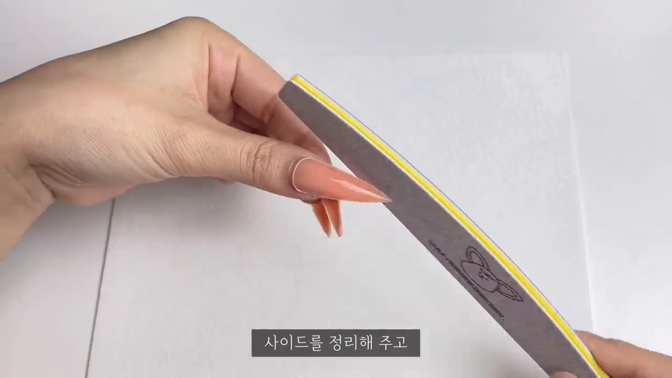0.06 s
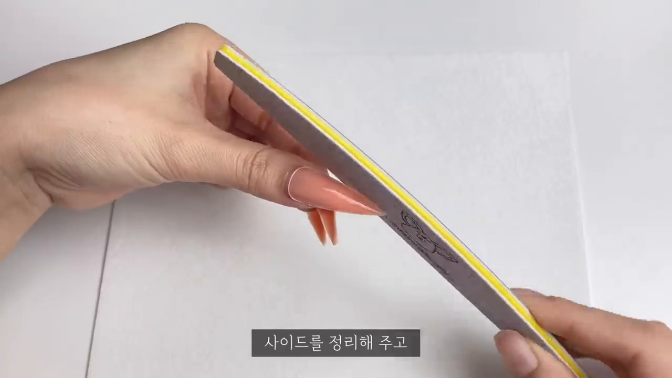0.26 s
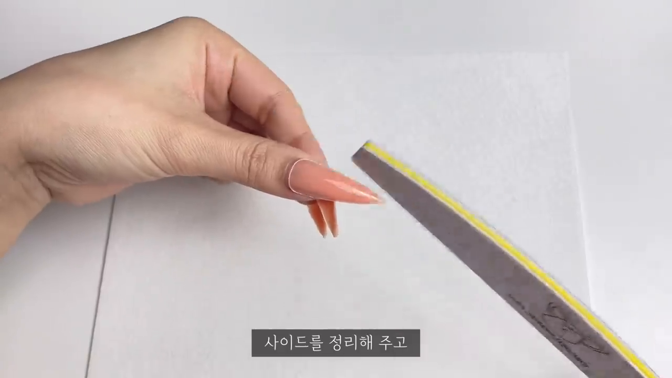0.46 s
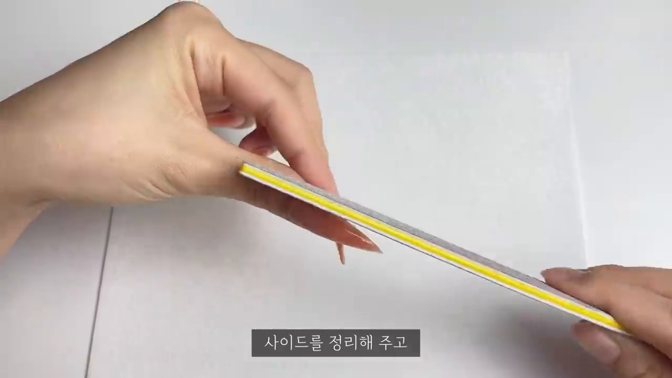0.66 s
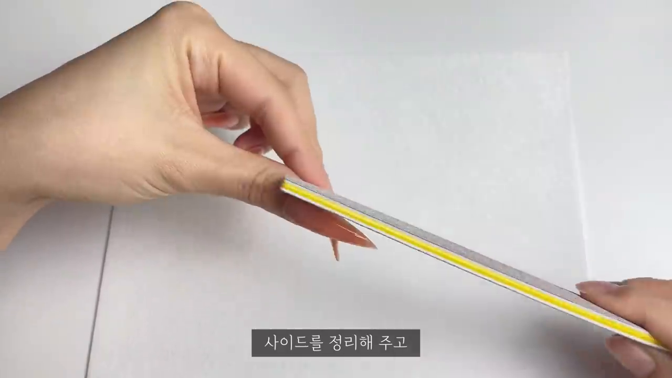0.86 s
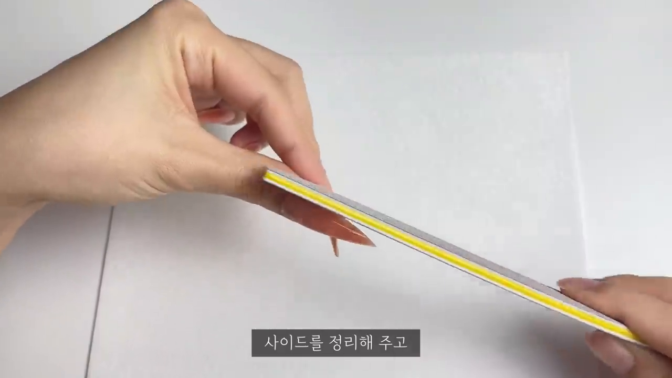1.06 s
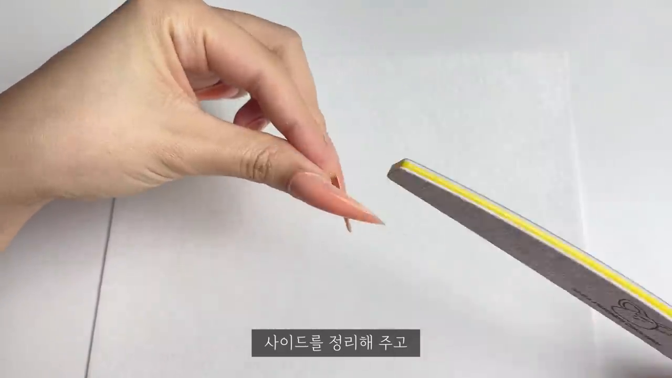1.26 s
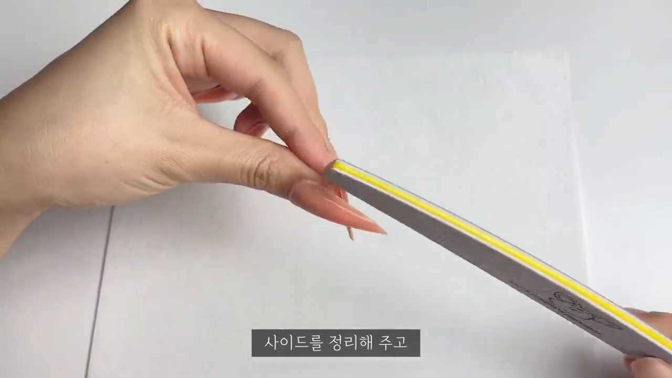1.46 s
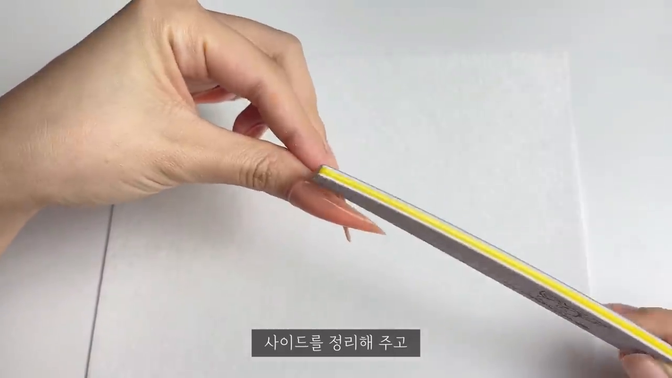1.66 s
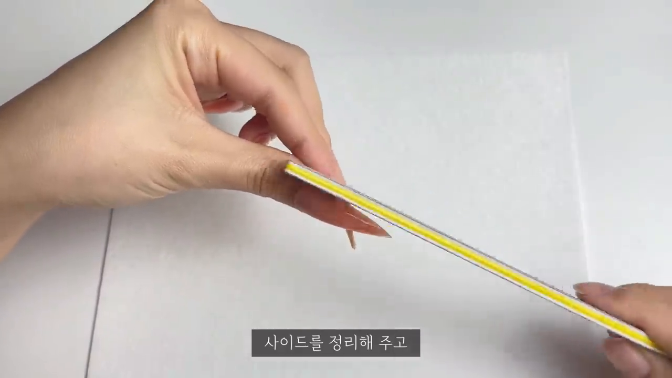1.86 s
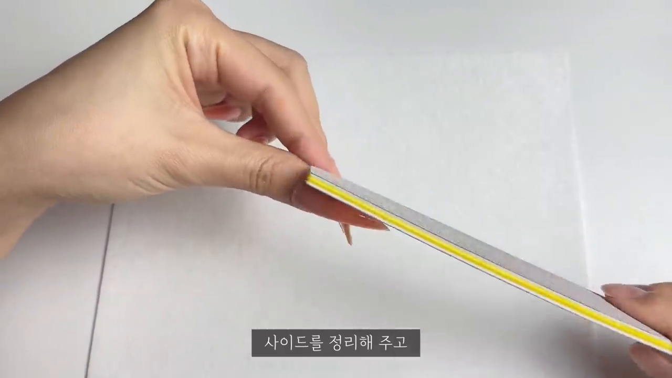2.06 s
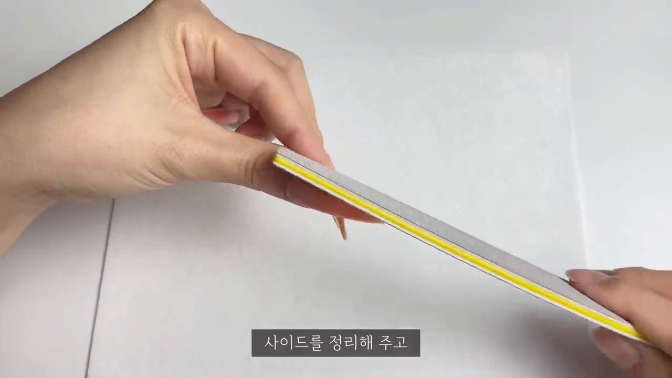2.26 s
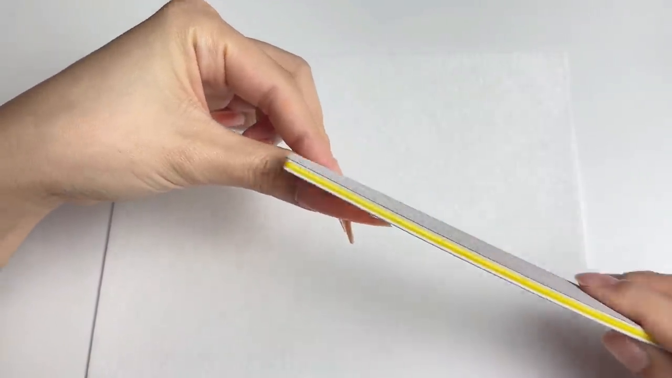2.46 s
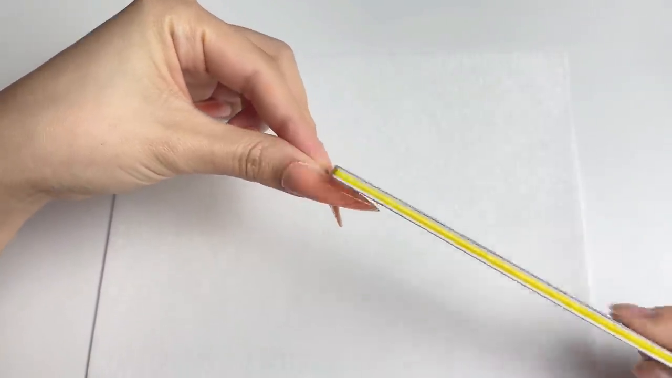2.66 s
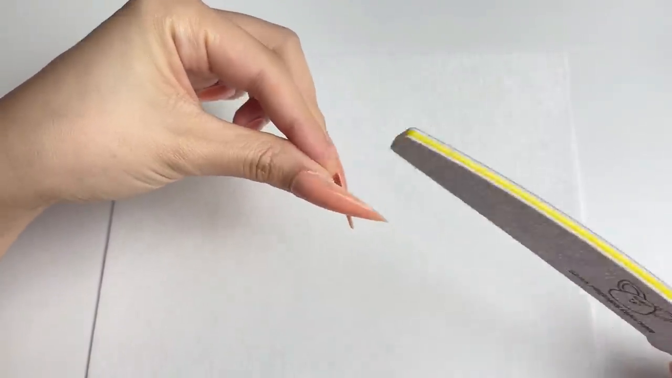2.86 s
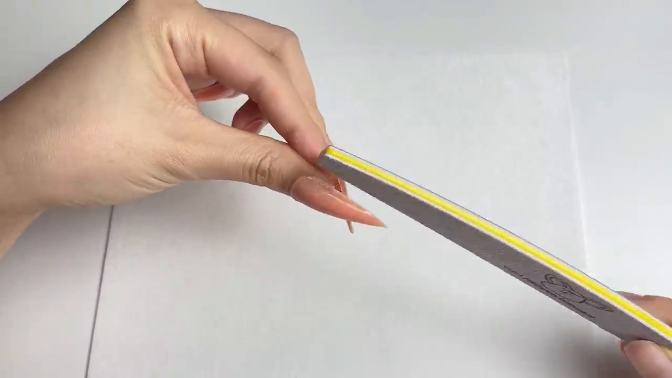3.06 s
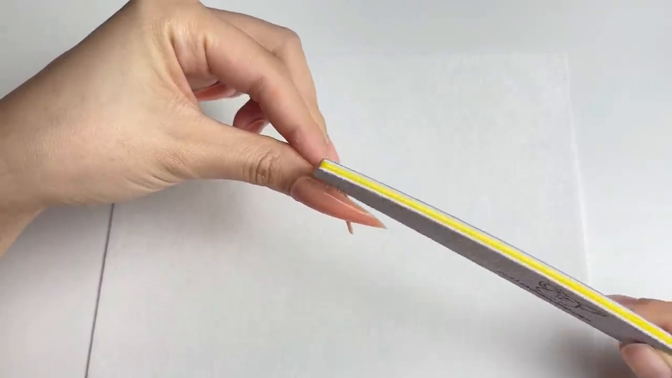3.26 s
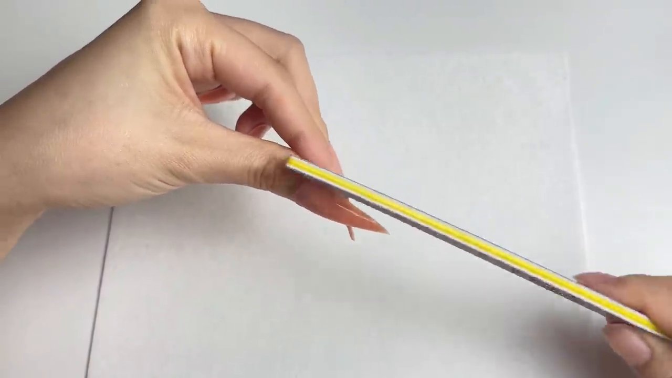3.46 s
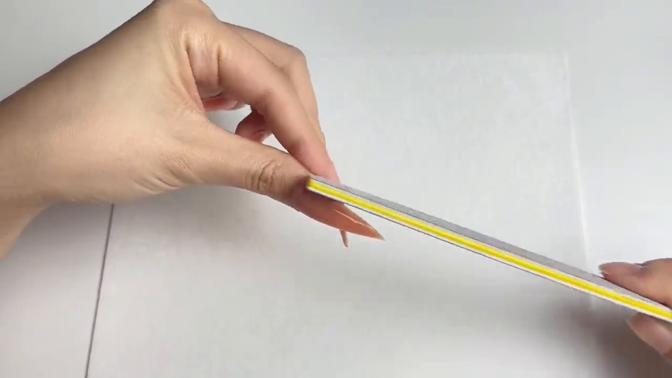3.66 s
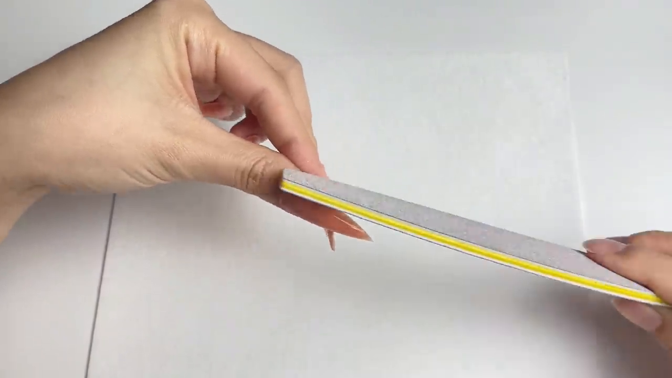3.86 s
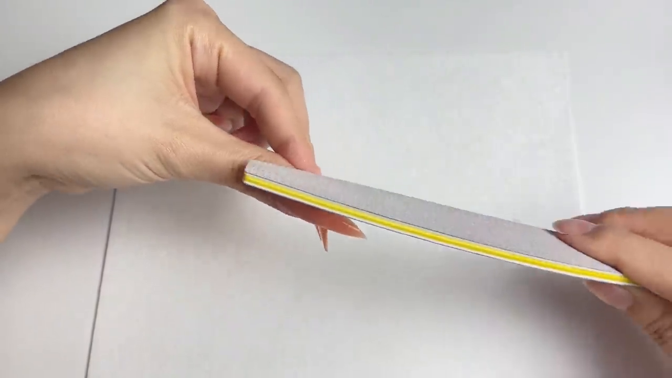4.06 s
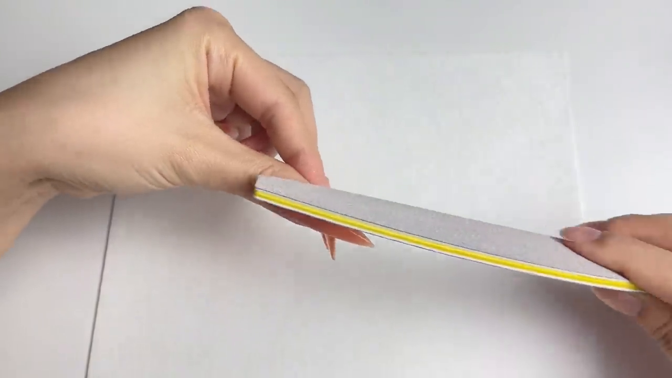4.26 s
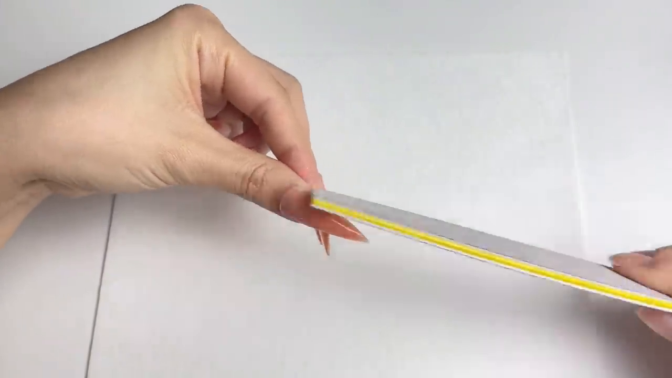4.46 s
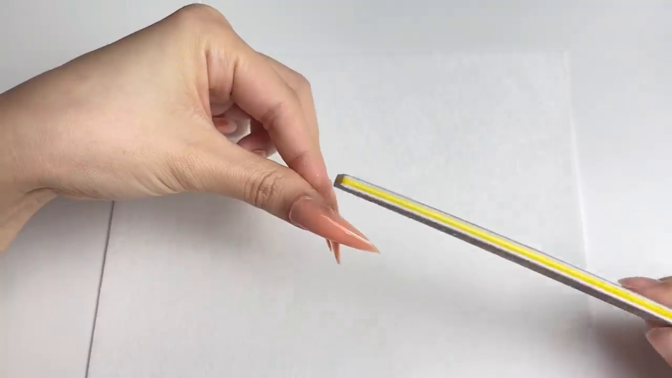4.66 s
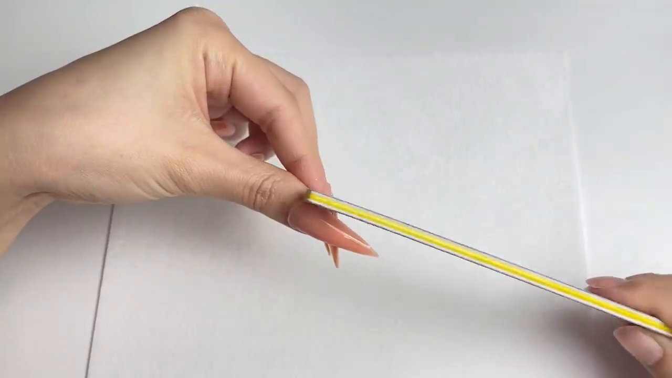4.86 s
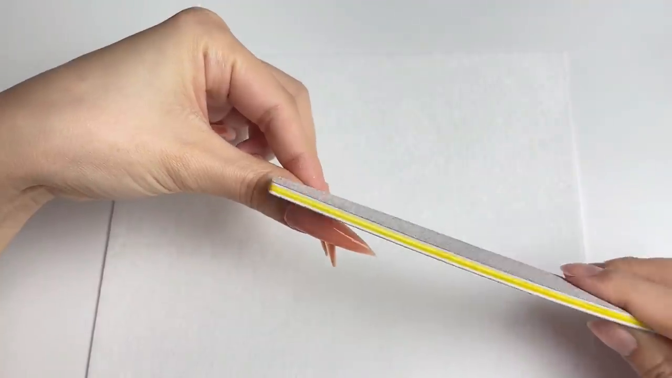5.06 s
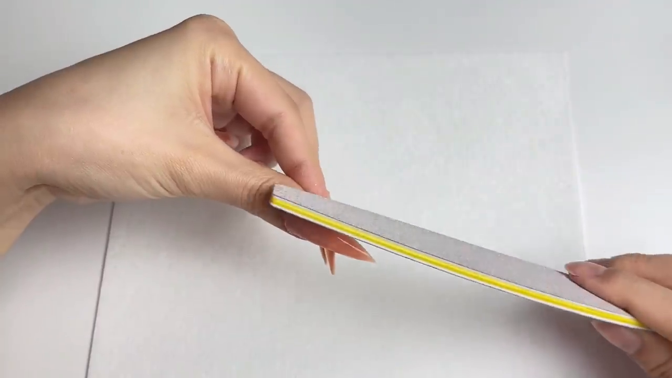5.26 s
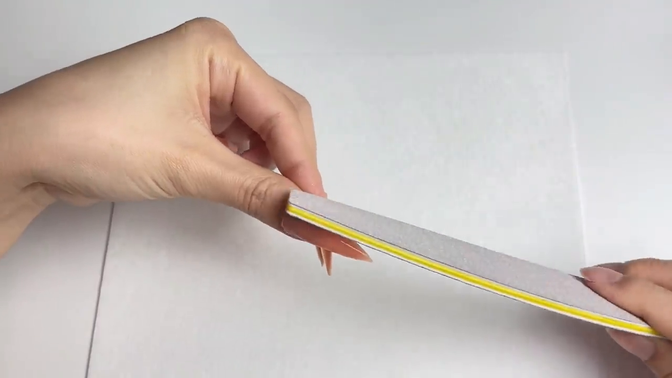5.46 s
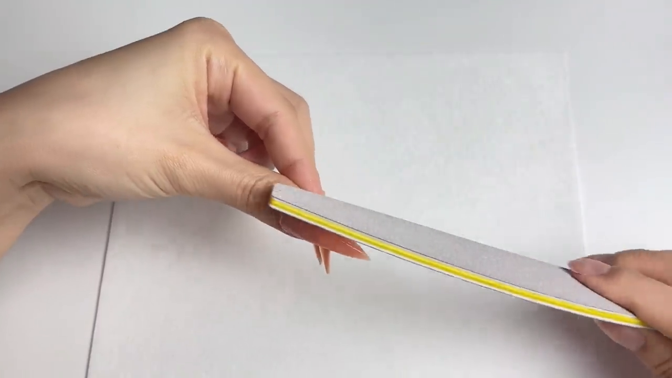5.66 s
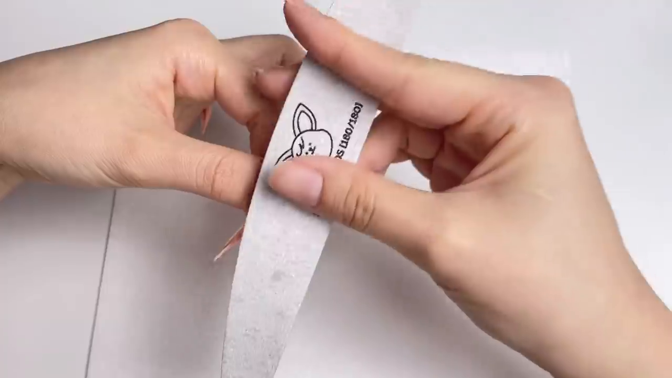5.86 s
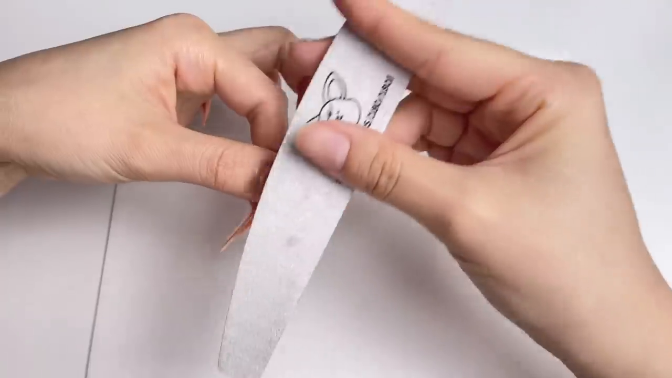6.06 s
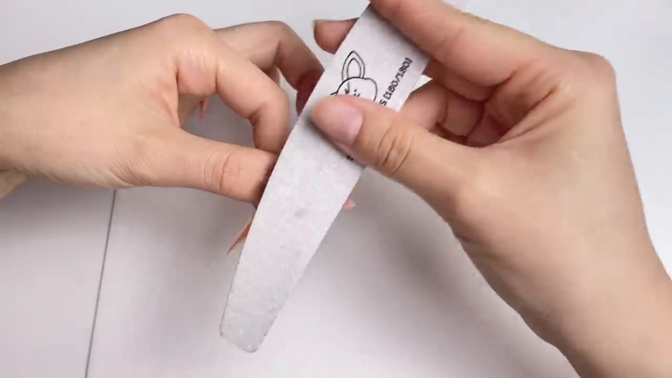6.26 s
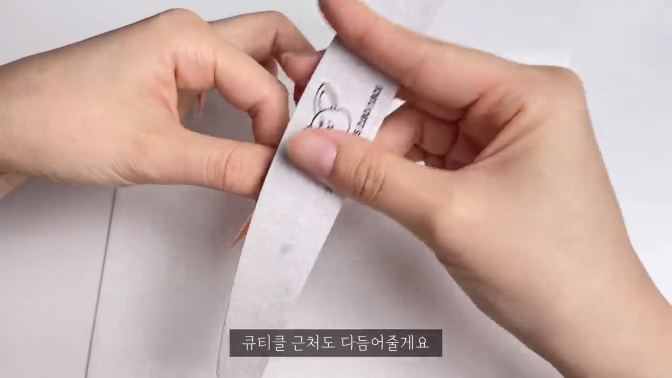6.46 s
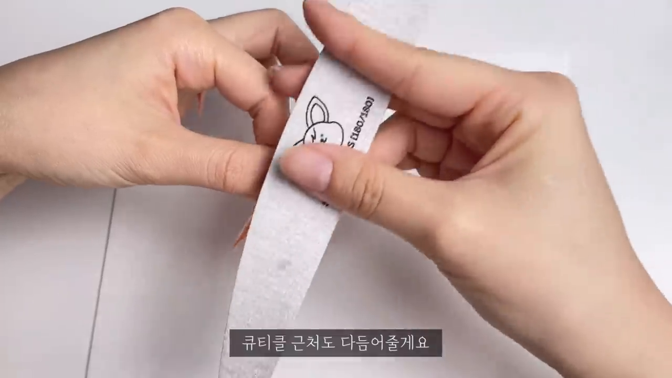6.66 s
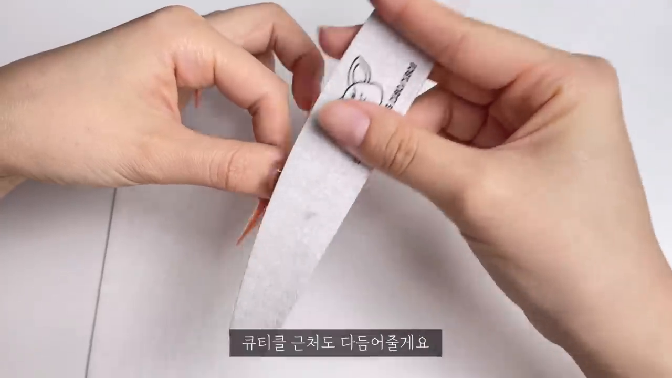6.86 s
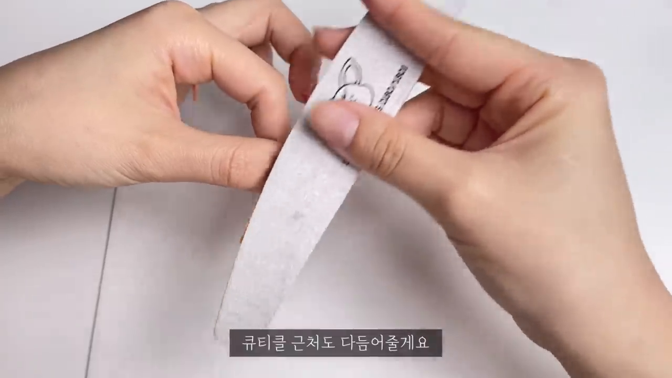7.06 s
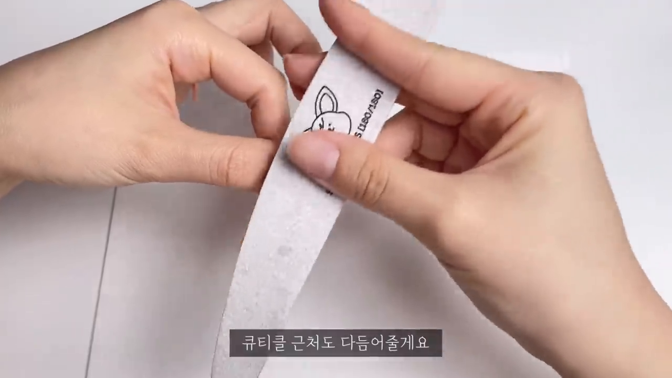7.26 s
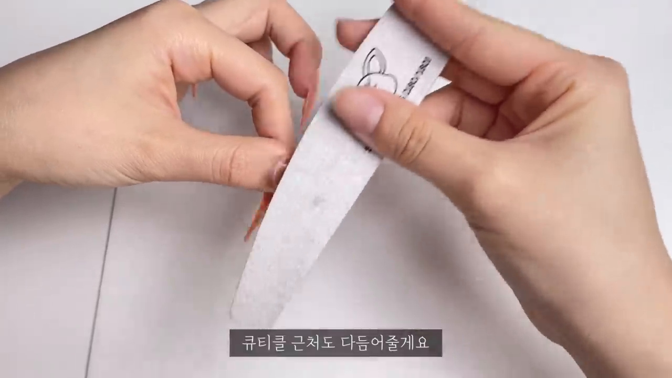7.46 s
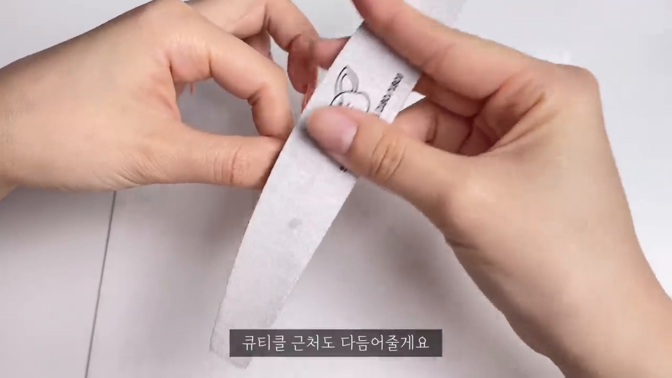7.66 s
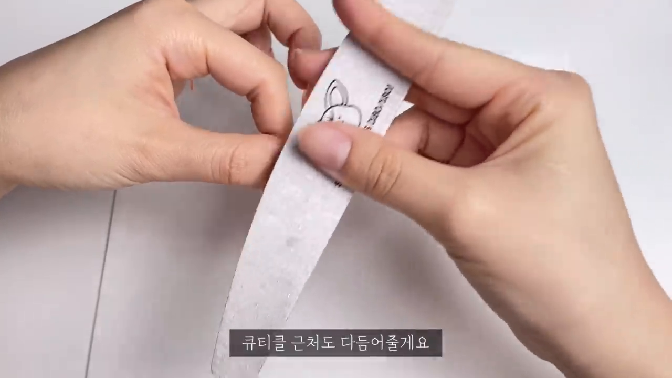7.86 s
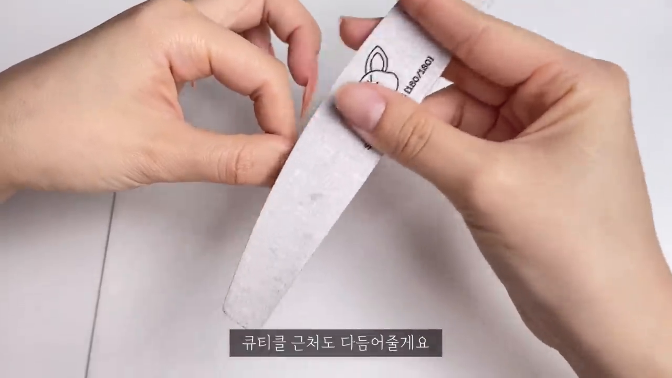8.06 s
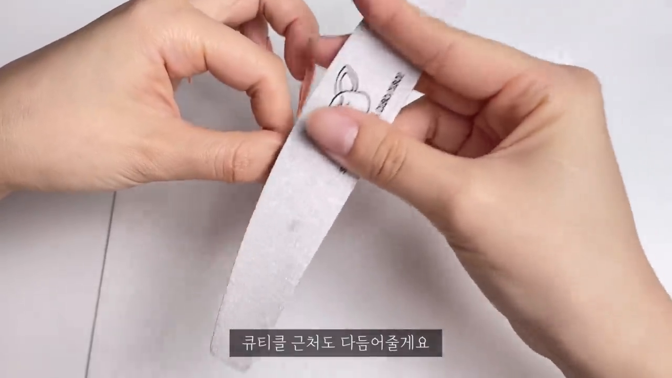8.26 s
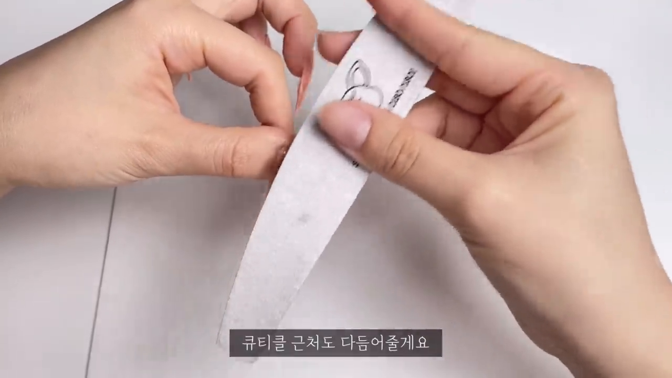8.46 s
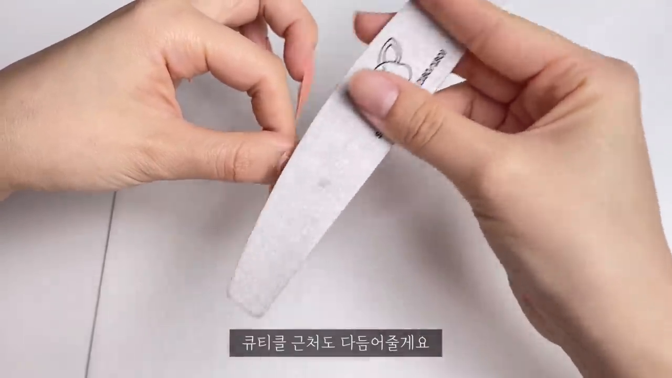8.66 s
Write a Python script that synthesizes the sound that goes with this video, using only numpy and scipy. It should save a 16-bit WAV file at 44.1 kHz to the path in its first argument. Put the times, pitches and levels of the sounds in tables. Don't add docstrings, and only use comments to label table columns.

```python
import sys
import numpy as np
from scipy import signal
from scipy.fft import rfft, irfft, next_fast_len
from scipy.io import wavfile
from scipy.ndimage import uniform_filter1d, map_coordinates

SR = 44100
rng = np.random.default_rng(int(sys.argv[2]) if len(sys.argv) > 2 else 0)


def elevation(decibels):
    levels = np.asarray(decibels, float)
    return 10 ** (levels / 20)


def inscribe(sig):
    pcm = np.round(np.clip(np.atleast_2d(sig).T, -1, 1) * 32767)
    wavfile.write(sys.argv[1], SR, pcm.astype(np.int16))


N = 383669


def unit(x):
    return x / np.sqrt(np.mean(x ** 2) + 1e-20)


def along(points, hz):
    f, v = np.transpose(points)
    return np.interp(np.log(hz + 1), np.log(f + 1), v)


def wobble(rate):
    steps = np.arange(0, N + 16, 16)
    knots = rng.standard_normal(int(N * rate / SR) + 4)
    return np.interp(np.arange(N), steps, map_coordinates(knots, [steps * rate / SR]))


def filtered(x, response):
    m = next_fast_len(N + 8192, real=True)
    return irfft(rfft(x, m) * response(np.fft.rfftfreq(m, 1 / SR)), m)[..., :N]


def coloured_noise(colour):
    return unit(filtered(rng.standard_normal(N), lambda hz: elevation(along(colour, hz))))


def drone(bands):
    total = np.zeros(N)
    for centre, width, db in bands:
        resonance = lambda hz: 1 / (1 + (2 * (hz - centre) / width) ** 2)
        band = unit(filtered(rng.standard_normal(N), resonance))
        total += elevation(db + 2.5 * wobble(4)) * band
    return unit(total)


def air():
    # (frequency [Hz], level [dB per Hz])
    air_colour = [(18, -52), (30, -38), (57, -0.5), (129, -4.5), (175, -7.5), (324, -11), (452, -12.5),
                  (1000, -19), (1290, -22), (1800, -23), (2510, -25), (8580, -32.5), (13600, -40.5)]
    # (centre [Hz], width [Hz], level [dB])
    hum = [(120, 35, 0), (146, 35, 0)]
    hum_high = [(223.6, 90, 0), (309, 140, -2)]
    # (time [s], level [dB])
    rumble = [(0.0, -60), (0.17, -46), (0.58, -58), (0.63, -44), (1.04, -55), (1.09, -48), (1.16, -61),
              (1.99, -51), (2.06, -58), (2.25, -44), (2.28, -50.5), (3.03, -63), (3.22, -51), (3.54, -64),
              (3.63, -53), (7.2, -60), (8.68, -57), (8.7, -63)]
    # (time [s], level [dB], half-width [s])
    swells = [
        (.13, -46.5, 0.083),
        (.5, -61, 0.07),
        (1.9, -59.5, 0.48),
        (2.4, -57, 0.13),
        (4.28, -54.5, 0.11),
        (4.55, -53, 0.052),
        (5.9, -57, 0.088),
    ]
    t = np.arange(N) / SR
    hiss = elevation(-52 + 0.49 * wobble(1.81)) * coloured_noise(air_colour)
    low = elevation(-0.5 + np.interp(t, *np.transpose(rumble)))
    upper = elevation(-61 + 2 * wobble(2.86))
    for s, db, wide in swells:
        upper += elevation(db) * np.exp(-((t - s) / wide) ** 2)
    return hiss + low * drone(hum) + upper * drone(hum_high)


def room(x):
    t = np.arange(SR // 4) / SR
    tails = rng.standard_normal((3, len(t))) * (t > .002)
    dull = uniform_filter1d(tails, size=4)
    bright = tails - dull
    tails = elevation(-60 * t / 0.16) * dull + .5 * elevation(-60 * t / 0.23) * bright
    turn = (np.arange(N) / SR * 7).astype(int) % 3
    answer = np.zeros(N)
    for k, tail in enumerate(tails):
        answer += signal.oaconvolve(x * (turn == k), tail / np.linalg.norm(tail))[:N]
    return answer


def slips():
    # (time [s], level [dB], length [s])
    slip_times = [
        (1.138, -33.5, 0.022),
        (2.668, -36, 0.028),
        (5.727, -30.5, 0.0088),
    ]
    # (frequency [Hz], level [dB per Hz])
    flex = [(400, -16), (750, -7), (1000, 5), (1400, 6), (1900, -8), (4000, -39.5)]
    t = np.arange(N) / SR
    shape = np.zeros(N)
    for s, db, long in slip_times:
        shape += elevation(db) * (t > s) * elevation(-20 * np.clip(t - s - long, 0, 1) / 0.011)
    return shape * coloured_noise(flex)


def taps():
    # (time [s], peak [dB], bright click relative to knock [dB])
    tap_times = [
        (5.88, -25.5, -13.5),
        (6.171, -22, -17),
        (6.416, -36, -14),
        (6.697, -40.5, 1),
        (7.285, -22.5, -20),
        (8.203, -35, -10),
        (8.551, -21.5, -6),
    ]
    # (frequency [Hz], level [dB], time to fall 60 dB [s])
    tap_modes = [(580, -2, .013), (1150, 0, .011), (1800, -10, .006)]
    t = np.arange(2000) / SR
    out = np.zeros(N + 2000)
    for s, db, click_db in tap_times:
        knock = sum(elevation(level - 60 * t / t60) * np.sin(2 * np.pi * hz * t) for hz, level, t60 in tap_modes)
        crack = uniform_filter1d(uniform_filter1d(rng.standard_normal(len(t)), size=4), size=4)
        click = np.sin(2 * np.pi * 2900 * t) + 0.51 * np.sin(2 * np.pi * 5200 * t) + 3.5 * crack
        click *= elevation(click_db - 60 * t / 0.0098)
        onset = 1 - np.exp(-t / .0007)
        out[round(s * SR):][:len(t)] += elevation(db) * (knock + click) * onset
    return out[:N]


def snags():
    # (time [s], peak [dB])
    snag_times = [(0.0822, -11), (0.1147, -12.5), (0.1302, -9), (0.2379, -20.5), (0.2886, -14),
                  (0.3249, -21), (0.354, -20), (0.3702, -16.5), (1.138, -19), (2.0108, -29), (2.6087, -20),
                  (3.8295, -37), (4.2223, -25.5), (4.2617, -19), (4.2984, -23), (4.406, -17), (4.4468, -18),
                  (5.7294, -20), (5.9725, -21.5), (6.2594, -30), (6.47, -18.5), (6.5232, -21),
                  (6.5464, -31), (6.7357, -24), (7.0694, -21), (7.3824, -35), (7.6797, -29), (8.2887, -24),
                  (8.6347, -24), (8.6624, -26)]
    t = np.arange(400) / SR
    u = t / .0015
    push = np.zeros(N + 400)
    for s, db in snag_times:
        push[round(s * SR):][:len(t)] += elevation(db - 7.5) * u * np.exp(1 - u)
    return push[:N] * rng.standard_normal(N)


def grit(density_hz, spread_db, clump_db, smooth):
    hits = (rng.random(N) < density_hz / SR) * rng.choice([-1, 1], N)
    size = np.clip(rng.standard_normal(N), -1.4, 1.4)
    grains = unit(hits * elevation(spread_db * size))
    patches = elevation(clump_db * (wobble(70) + 0.79 * wobble(260)))
    return unit((grains + smooth * rng.standard_normal(N)) * patches)


def ringing(tone, modes, stretch, focus):
    hz = np.fft.rfftfreq(4096, 1 / SR)
    lifts = 0
    for centre, width, lift in modes:
        width = max(width, 480)
        lifts = lifts + lift * np.exp(-(2 * (hz - centre * stretch) / width) ** 2)
    db = along(tone, hz) + focus * lifts
    cep = irfft(np.log(elevation(np.maximum(db, -70))))
    cep[1:2048] *= 2
    cep[2049:] = 0
    return irfft(np.exp(rfft(cep)))[:1024]


def motion(rows, power, bite):
    t = np.arange(N) / SR
    rows = np.array(rows)
    under_way = np.maximum(np.searchsorted(rows[:, 0], t) - 1, 0)
    start, long, peak_db, fastest, bend_db = rows[under_way].T
    u = np.clip((t - start) / long, 0, 1)
    fastest = np.clip(fastest, .05, .95)
    speed = np.sin(np.pi / 2 * np.minimum(u / fastest, (1 - u) / (1 - fastest)))
    land_s, lift_s = .018, 0.032
    contact = np.clip(np.minimum(u * long / land_s, (1 - u) * long / lift_s), 1e-6, 1)
    rasp = contact * (bite + (1 - bite) * speed ** power)
    rasp = uniform_filter1d(rasp, size=441)
    return 20 * np.log10(np.abs(rasp) + 1e-7), u - .5, peak_db, bend_db


def strokes(rows, tone, modes, force, snag, power, bite, clarity, dust_db, dust_drift_db, clog_db, bend_drift_db):
    pace_db, progress, peak_db, bend_db = motion(rows, power, bite)
    held = np.abs(progress) < .5
    slide = .5 - .5 * np.tanh((peak_db + pace_db + 43) / 6 + .4 * wobble(9))
    free_board = ringing(tone, modes, 1.015, 1.696)
    pressed_board = ringing(tone, modes, .99, clarity)

    def ring(x):
        free = signal.oaconvolve(x, free_board)[:N]
        pressed = signal.oaconvolve(x, pressed_board)[:N]
        return slide * free + (1 - slide) * pressed

    def low(hz, edge):
        return 1 / (1 + (hz / edge) ** 12)

    sound = ring(force)
    bend = filtered(sound, lambda hz: low(hz, 1900))
    dust = filtered(sound, lambda hz: 1 - low(hz, 9000))
    rasp = sound - bend - dust
    bend_gain_db = 0.68 * pace_db + bend_db + bend_drift_db * progress
    dust_gain_db = 1.39 * pace_db + dust_db + clog_db * (np.arange(N) / SR - rows[0][0])
    dust_gain_db += dust_drift_db * progress - 0.42 * bend_db
    rubbing = elevation(pace_db) * unit(rasp) + elevation(bend_gain_db) * unit(bend) + elevation(dust_gain_db) * unit(dust)
    return held * elevation(peak_db) * rubbing + ring(held * snag) / np.linalg.norm(free_board)


def tip_strokes(snag):
    # (start [s], length [s], rasp peak [dB], fastest point [share of length],
    # bending below 1.9 kHz [dB])
    tip = [
        (0.003, 0.2, -25.5, 0.67, -9),
        (0.218, 0.23, -23, 0.51, -13.5),
    ]
    # (frequency [Hz], level [dB per Hz])
    tone = [(180, -29), (300, -12), (405, -21), (593, -8.5), (826, -9.5), (1110, -5), (1800, -7), (3220, 1),
            (15900, -6.5)]
    # (frequency [Hz], width [Hz], lift [dB])
    modes = [(1280, 750, 8), (3250, 550, 0.5), (3900, 300, 1), (5880, 280, 4), (7780, 340, 7),
             (10000, 1700, 3.5)]
    force = grit(5000, 4.4, 0.77, smooth=0.65)
    return strokes(tip, tone, modes, force, snag, power=1.63, bite=0.12, clarity=1,
                   dust_db=-6, dust_drift_db=-1.5, clog_db=-5.5, bend_drift_db=2)


def side_strokes(snag):
    # (start [s], length [s], rasp peak [dB],
    # fastest point [share of length], bending below 1.9 kHz [dB])
    edge_on = [(0.57, 0.13, -35, 0.77, -15.5), (0.712, 0.14, -33, 0.47, -9.5),
               (0.858, .134, -33.5, .5, -15.5), (0.988, 0.17, -31, 0.73, -11.5),
               (1.128, .063, -30.5, 0.14, -13), (1.778, 0.12, -49, 0.58, -14), (1.977, 0.1, -42, 0.66, -11),
               (2.106, .12, -37, 0.49, -14.5), (2.238, 0.13, -31.5, 0.65, -12),
               (2.374, 0.16, -34.5, .53, -13), (2.549, 0.18, -25, 0.49, -14.5),
               (3.377, 0.14, -49.5, 0.54, -19), (3.528, 0.12, -43.5, 0.55, -14.5),
               (3.661, 0.12, -41.5, 0.66, -14.5)]
    tilted = [(3.8, .115, -39.5, 0.37, -5), (3.929, .133, -41.5, 0.35, -9.5), (4.073, 0.12, -41, 0.51, -7),
              (4.202, .142, -32, 0.47, -10.5), (4.338, .16, -34.5, 0.56, -17.5),
              (4.909, .118, -54, .46, -14), (5.075, 0.11, -42, 0.69, -5.5), (5.203, .12, -41.5, .46, -12),
              (5.344, .12, -36.5, 0.56, -5), (5.46, .13, -34, 0.47, -11.5), (5.62, .138, -28, 0.64, -9.5)]
    # (frequency [Hz], level [dB per Hz])
    tone = [(240, -55), (400, -26), (729, -16), (1310, -4.5), (1900, -9.5), (3100, -0.5), (4420, -7),
            (5000, -2), (15900, -1.5)]
    # (frequency [Hz], width [Hz], lift [dB])
    edge_modes = [(1414, 410, 7.9), (2160, 350, 3), (2670, 420, -1.5), (3450, 900, 4.5), (4080, 650, -2.5),
                  (4455, 650, 12), (5700, 690, 3), (7050, 790, 3), (7780, 780, 4), (9300, 400, -0.5),
                  (9760, 630, 2), (13500, 560, -7)]
    tilted_modes = [(1390, 220, 5), (3490, 820, 4), (4490, 600, 7.1), (6840, 230, 1.1), (8060, 770, 2.5),
                    (8600, 270, 1.5), (11200, 680, 2.7), (13300, 570, 2)]
    force = grit(6000, 3.9, 1.0, smooth=0.69)
    sound = strokes(edge_on, tone, edge_modes, force, snag, power=1.43, bite=0.093, clarity=1.36,
                    dust_db=-8.5, dust_drift_db=-.6, clog_db=0, bend_drift_db=3)
    return sound + strokes(tilted, tone, tilted_modes, force, snag, power=2.7, bite=0.21, clarity=1,
                           dust_db=-7, dust_drift_db=-1.5, clog_db=-0.1, bend_drift_db=0.5)


def top_strokes(snag):
    # (start [s], length [s], rasp peak [dB], fastest point [share of length],
    # bending below 1.9 kHz [dB])
    top = [
        (5.896, .128, -30.5, .42, -6.5),
        (6.175, 0.12, -31, 0.6, -10.5),
        (6.447, 0.12, -34.5, 0.16, -12),
        (6.715, 0.12, -30, 0.46, -8.5),
        (7.009, .142, -33, .38, -7.5),
        (7.307, 0.14, -33, 0.4, -9.5),
        (7.62, .132, -32.5, 0.49, -6.5),
        (7.94, 0.14, -33, .5, -5),
        (8.24, 0.14, -32.5, 0.48, -7),
        (8.549, 0.15, -34.5, .58, -5),
    ]
    # (frequency [Hz], level [dB per Hz])
    tone = [(150, -28), (250, -19), (986, -5.5), (2190, -8.5), (3000, -2), (5320, -7), (6110, -9),
            (7790, -12), (15900, -26)]
    # (frequency [Hz], width [Hz], lift [dB])
    modes = [(530, 300, 5), (1110, 570, 3), (2270, 450, -3.5), (2740, 1100, 3), (4620, 320, 4),
             (5330, 550, 8), (7150, 310, 2), (7900, 1360, 4), (14900, 2100, 7)]
    force = grit(4000, 5.2, 1.4, smooth=0.59)
    return strokes(top, tone, modes, force, snag, power=1.82, bite=0.37, clarity=1.37,
                   dust_db=-14, dust_drift_db=10, clog_db=1, bend_drift_db=-5)


def patchy(x, depth_db):
    z = signal.stft(x, nperseg=256)[2]
    field = uniform_filter1d(rng.standard_normal(z.shape), 2, 0)
    field = uniform_filter1d(field, 20, 1)
    return signal.istft(z * elevation(depth_db * unit(field)), nperseg=256)[1][:N]


def scene():
    snag = snags()
    near = tip_strokes(snag) + side_strokes(snag) + top_strokes(snag)
    near = patchy(near, depth_db=1.8) + taps() + slips()
    return (near + elevation(-15.5) * room(near) + air())[None]


def band_limit(x):
    return signal.sosfilt(signal.butter(12, 16030, fs=SR, output="sos"), x)


def record(dry):
    mix = filtered(dry, lambda hz: 1 / np.sqrt(1 + (45 / (hz + 1)) ** 4))
    return band_limit(mix)


dry = scene()
out = record(dry)
inscribe(out)
```